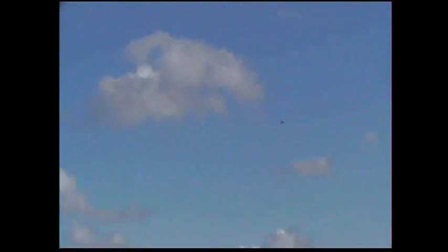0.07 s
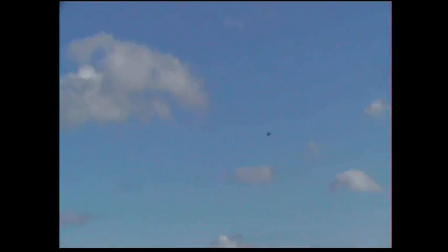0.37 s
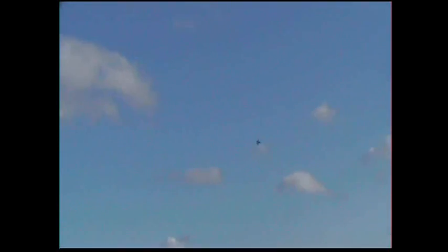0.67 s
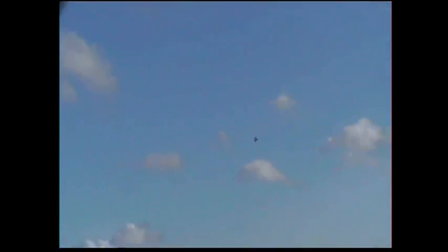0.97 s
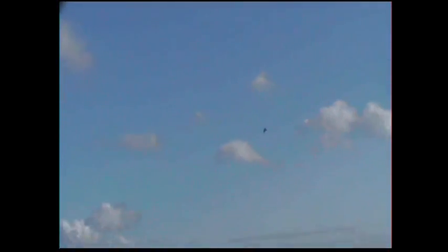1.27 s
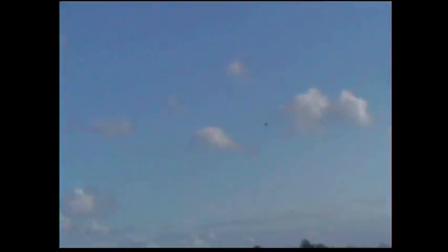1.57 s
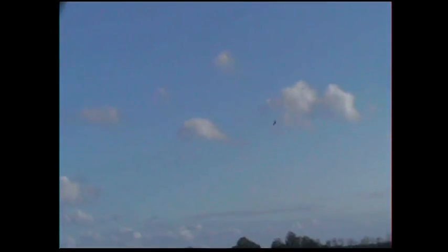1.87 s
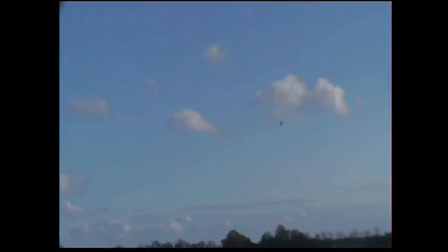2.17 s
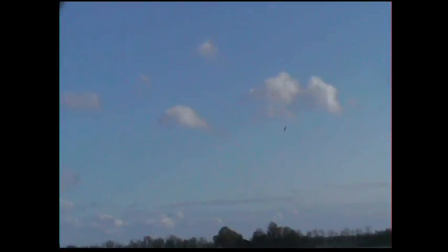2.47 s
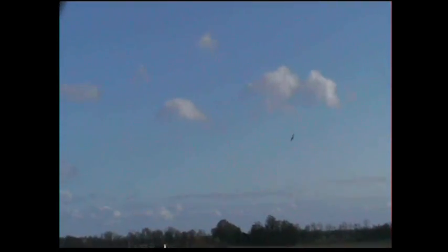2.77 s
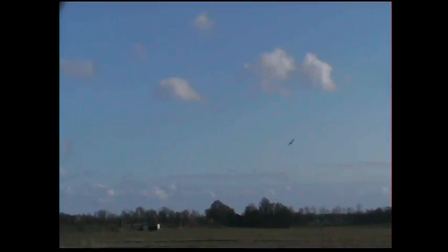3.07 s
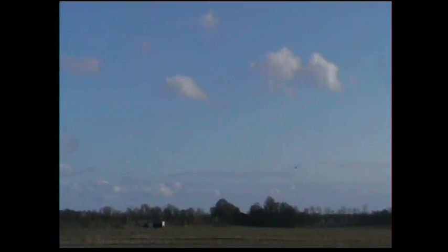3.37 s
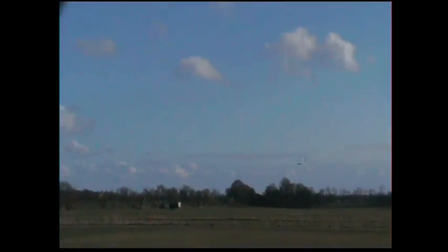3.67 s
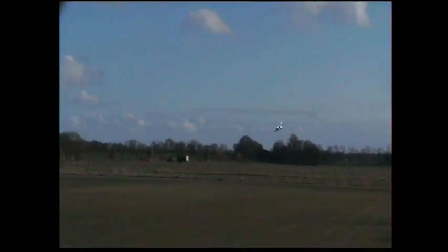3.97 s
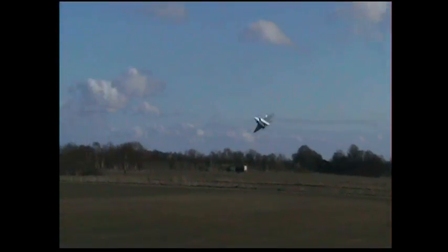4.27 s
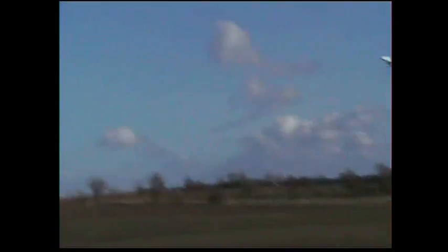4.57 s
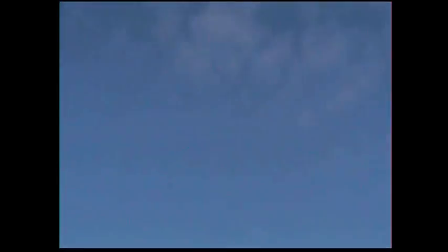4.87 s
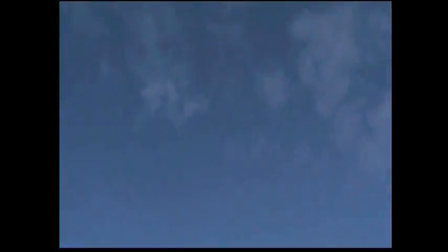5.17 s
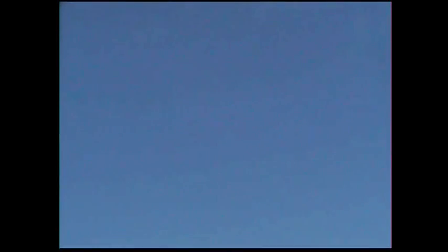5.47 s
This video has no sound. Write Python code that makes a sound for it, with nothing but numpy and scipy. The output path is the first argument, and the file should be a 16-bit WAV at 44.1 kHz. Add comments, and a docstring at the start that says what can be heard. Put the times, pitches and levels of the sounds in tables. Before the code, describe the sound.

The high, wavering whine of an electric model jet approaches over a field, swells into a hissing close pass and falls.

```python
"""Low pass of a model jet

A model jet with an electric six-blade ducted fan dives toward a field and passes low and close.
The fan hums at its shaft rate and whines at its blade rate, both Doppler shifted, over the mixing
noise of its exhaust; interference with the ground echo sweeps a comb through that noise.
Light gusts touch the microphone of a camera that has a faint whistle of its own."""
import sys
import numpy as np
from scipy import signal
from scipy.fft import rfft, irfft, next_fast_len
from scipy.io import wavfile
from scipy.ndimage import uniform_filter1d

SR = 44100
rng = np.random.default_rng(int(sys.argv[2]) if len(sys.argv) > 2 else 0)


def master_out(mix):
    """Clip the mix to full scale and print it as 16-bit PCM to the path in sys.argv[1]."""
    frames = np.transpose(np.atleast_2d(mix))
    ceiling = np.clip(frames, -1, 1)
    pcm = np.round(ceiling * 32767).astype(np.int16)
    wavfile.write(sys.argv[1], SR, pcm)


N = 247664

# shaft rate as heard, Doppler shift included: t/s, f/Hz
SHAFT_RATE = [(0, 476.3), (.5, 484.7), (.75, 490.3), (1, 498.3), (1.5, 513.6), (2, 532.7), (2.25, 538.7),
              (2.5, 543), (2.8, 545.8), (3.5, 550.7), (4.2, 551.7), (4.55, 549.4), (4.72, 544),
              (4.9, 534.8), (5.1, 520.5), (5.25, 505.3), (5.45, 481), (5.62, 466.5)]


def fan(path, twinkle_db, treble_db):
    """Rotor harmonics: a hum at the shaft rate, a whine at multiples of six times it, a buzz between."""
    # tone at the shaft rate: t/s, level/dB
    hum_levels = [(0.0, -50), (0.28, -49.5), (0.87, -46), (0.97, -41), (1.41, -41.5), (1.52, -39.5),
                  (2.14, -44), (2.92, -57.5), (3.27, -53), (3.68, -57), (3.74, -70), (3.94, -50.5),
                  (4.88, -31.5), (5.1, -35.5), (5.15, -42.5), (5.27, -35.5), (5.51, -31.5), (5.62, -38.5)]
    # upper blade partials: shaft order, relative level/dB, share of the air absorption
    blade_partials = [(18, 2, 0), (24, -3.5, 0.68), (30, -6, 1.2)]
    # weak harmonics of the buzz: shaft order, relative level/dB
    shaft_orders = [(2, 2.5), (3, -0.5), (4, -4), (5, -6), (7, -5.5), (8, -39), (11, -44), (13, -33)]
    near_db, tail, whine_swing_db, octave_swing_db, _ = path
    hum_db = in_time(hum_levels)
    whine_db = -30.5 + 0.88 * near_db - 0.65 * tail + whine_swing_db
    octave_db = -42.5 + 1.15 * near_db + 1.3 * tail + octave_swing_db
    upper_db = heard(path, db=-51, near_share=1.485, tail_db=13.5, flare_share=1.1)
    buzz_db = 0.51 * hum_db + heard(path, db=-32.5, near_share=0.38, tail_db=-3, flare_share=0.67)
    shaft_hz = in_time(SHAFT_RATE) * (1 + 0.00028 * drift(2.98))
    angle = 2 * np.pi * np.cumsum(shaft_hz) / SR
    out = from_db(hum_db + 0.1) * wavering(angle, rough=0.11, rate=12)
    out += from_db(whine_db + 0.49 * twinkle_db) * wavering(6 * angle, rough=0.12, rate=45)
    out += from_db(octave_db + twinkle_db) * wavering(12 * angle, rough=0.7, rate=11)
    for order, db, share in blade_partials:
        partial_db = upper_db + db + share * treble_db + twinkle_db + flutter_db()
        out += from_db(partial_db) * wavering(order * angle, rough=0.73, rate=43)
    for order, db in shaft_orders:
        out += from_db(buzz_db + db) * wavering(order * angle, rough=0.53, rate=8.3)
    return out


def scattered_whine(path):
    """Scattering by the air and the field: rough tones that beat against the blade tone."""
    # returns off the field, with less Doppler lift: t/s, length/s, multiple of the shaft rate, level/dB
    returns = [(3.662, .14, 5.6, -48.5), (4.543, 0.16, 5.75, -38.5)]
    angle = 2 * np.pi * np.cumsum(in_time(SHAFT_RATE)) / SR
    halo_db = heard(path, db=-50, near_share=0.46, tail_db=5, flare_share=0.1)
    out = from_db(halo_db) * wavering(6 * angle, rough=1.8, rate=36)
    for s, length, multiple, db in returns:
        out += from_db(db) * bell(s, length) * wavering(multiple * angle, rough=2.5, rate=30)
    return out


def exhaust(path, twinkle_db, treble_db):
    """Turbulent mixing: five bands of noise, the deep wake beamed backward, the top absorbed by air."""
    # spectra of the bands: f/Hz, relative density/dB
    roar_spectrum = [(200, -25.5), (400, -6.5), (600, -1), (800, 4.5), (1050, 0.5), (1300, -12.5),
                     (1800, -5.5)]
    rush_spectrum = [(700, -6), (1250, 6), (1600, 3.5), (2100, 3.5), (2700, 7), (3300, 7), (4200, -48),
                     (6000, -26)]
    hiss_spectrum = [(2000, -2.5), (3000, -1), (3700, 6), (4600, 1), (5700, 3), (6500, -1), (7300, -6.5),
                     (9000, -37)]
    sizzle_spectrum = [(5000, 4), (7000, 1), (8200, 0), (9400, -0.5), (10800, -2), (12800, -3),
                       (14500, -10), (16500, -5)]
    wake_spectrum = [(100, -20), (200, -12.5), (300, -9), (420, -4.5), (600, 1), (800, -0.5), (1200, -61)]
    roar_db = heard(path, db=-49.5, near_share=0.5, tail_db=5.5, flare_share=0.21)
    roar_db += 9 * bell(s=4.325, length=0.035)   # a brief swell as the jet closes in
    rush_db = heard(path, db=-40, near_share=0.84, tail_db=-1, flare_share=0.48)
    hiss_db = heard(path, db=-36, near_share=0.99, tail_db=-1, flare_share=1.0)
    sizzle_db = heard(path, db=-43, near_share=1.51, tail_db=9, flare_share=1.27)
    wake_db = heard(path, db=-70, near_share=0.83, tail_db=30.5, flare_share=0.1)
    sizzle = noise(sizzle_spectrum)
    top = coloured(sizzle, [(8000, -40), (10500, -6), (12500, 0)])
    sizzle = sizzle - top + top * from_db(treble_db + flutter_db())
    out = from_db(roar_db) * noise(roar_spectrum)
    out += from_db(rush_db + 1.3 * twinkle_db) * noise(rush_spectrum)
    out += from_db(hiss_db + 1.36 * twinkle_db) * noise(hiss_spectrum)
    out += from_db(sizzle_db + 0.57 * twinkle_db + flutter_db()) * sizzle
    return out + from_db(wake_db) * noise(wake_spectrum)


def flight():
    """Propagation from a moving source: nearness/dB, tail-on share, swings/dB of whine, octave, hiss."""
    # nearness of the jet: t/s, level/dB relative to the closest point
    nearness = [(0, -29), (1.2, -34.5), (1.75, -32), (2.35, -26.5), (2.75, -22), (2.87, -21), (3.45, -18),
                (3.95, -9.5), (4.2, -3), (4.6, 0), (4.9, -1.5), (5.25, -3.5), (5.62, -6)]
    # moving air focuses the sound for a moment: t/s, length/s, whine/dB, octave/dB, hiss/dB
    flares = [(0.027, 0.11, 9.5, 20.5, 7.5), (0.216, 0.11, 17, 18.5, 13), (0.63, 0.05, 3.5, 9, 6),
              (0.748, .08, 5, 15, 5), (0.986, 0.12, 6, 14, 7.5), (1.395, 0.11, 14.5, 10, 8.5),
              (1.546, 0.093, 10, -4, 4.5), (1.775, 0.063, 10.5, 2, 7), (1.937, 0.12, 9, 5, 7.5),
              (2.151, 0.22, 18, 9, 11), (2.603, 0.45, 5, -0.5, 0), (2.891, 0.16, 6.5, 12.5, 6.5),
              (3.163, 0.17, 7, 7, 8), (3.68, .15, 6.5, 0, 1), (3.86, .09, 0, 8, 3.5),
              (4.15, 0.37, 5.5, -2, 2), (4.604, 0.093, 1.5, 5.5, 4), (4.801, 0.025, -0.5, 7, 4),
              (4.91, 0.066, 0.5, 3, 2.5), (5.036, 0.091, 4, 6, 1), (5.115, 0.052, 8, 3, 1.5),
              (5.194, 0.037, 7, -0.5, -2), (5.268, 0.044, 3.5, 1, 4), (5.482, 0.12, -4, 11, 1.5),
              (5.578, 0.095, 5.5, 2, 0)]
    # the whine fades briefly: same columns
    dropouts = [(1.184, 0.32, -4.5, 0, 0), (2.318, 0.12, -3, 3, -4), (3.023, 0.055, -8, 6, 5.5),
                (3.43, 0.11, -1.5, -18, 6), (3.975, 0.095, -12.5, 2, 1), (4.841, 0.037, -21, 1, 0),
                (4.967, 0.067, -9.5, 3, 0), (5.082, 0.017, -16, -5, -3), (5.409, 0.1, -11.5, -9, -3)]
    # the Doppler drop tells how far the jet has turned its tail to the listener
    nose_on_hz, tail_on_drop_hz = 552, 55.6
    tail = np.sqrt(np.clip((nose_on_hz - in_time(SHAFT_RATE)) / tail_on_drop_hz, 0, 1))
    swings_db = sum(np.outer(dbs, bell(s, length)) for s, length, *dbs in flares + dropouts)
    return in_time(nearness), tail, *swings_db


def heard(path, db, near_share, tail_db, flare_share):
    """Spreading, directivity and focusing: a layer's level/dB follows nearness, tail angle and flares."""
    near_db, tail, _, _, flare_db = path
    return db + near_share * near_db + tail_db * tail + flare_share * flare_db


def wavering(phase, rough, rate):
    """Scintillation: turbulent air shakes the amplitude and phase of a tone of unit power."""
    in_phase = (1 + rough * drift(rate)) * np.sin(phase)
    quadrature = rough * drift(rate) * np.cos(phase)
    return np.sqrt(2 / (1 + 2 * rough ** 2)) * (in_phase + quadrature)


def flutter_db():
    """Scintillation of the treble: a separate level swing/dB for each high partial or band."""
    return 1.23 * drift(11.6)


def over_ground(x):
    """Two-path interference: direct sound and its bounce off the grass form a moving comb filter."""
    # lag of the bounce, short while the jet is low: t/s, lag/ms
    ground_lag = [(0, 2.75), (.7, 2.48), (1.2, 2.15), (2.2, 1.4), (2.9, 1.35), (3.35, 1.27), (3.65, 1.18),
                  (3.95, .94), (4.25, .8), (4.52, .76), (4.72, .92), (4.9, 1.45), (5.05, 2.2), (5.25, 3.2),
                  (5.39, 3.66), (5.62, 3.6)]
    # at a grazing angle the grass turns the wave over: lag/ms, phase/rad
    bounce_phase = [(1.35, 4.03), (1.75, 4.1), (2.4, 5.36), (3.3, 5.87)]
    # reflection off rough grass at a steep angle: f/Hz, gain/dB
    grass_response = [(500, 0), (2000, -0.5), (4000, -3.5), (8000, 2), (14000, -18)]
    lag_ms = in_time(ground_lag)
    grazing = np.interp(lag_ms, [0.88, 1.36], [1, 0])
    # at a grazing angle the bounce is stronger and keeps more of its treble
    strength = 0.42 + 0.2 * grazing
    dull = coloured(x, grass_response)
    reflected = dull + 0.6 * grazing * (x - dull)
    analytic = signal.hilbert(reflected, next_fast_len(N))[:N]
    phase = np.interp(lag_ms, *np.transpose(bounce_phase))
    bounce = np.real(np.exp(1j * phase) * delayed(analytic, lag_ms / 1000))
    return (x + strength * bounce) / np.sqrt(1 + strength ** 2)


def far_echo(x, lag_s, level_db):
    """Reflection from the edge of the field: one late, dull return."""
    dull = signal.sosfilt(signal.butter(1, 3500, fs=SR, output="sos"), x)
    return from_db(level_db) * delayed(dull, lag_s)


def ports(x, diffuse):
    """Spatial coherence: two close microphone ports agree in the midrange and part in the treble."""
    # diffuse sound that reaches the ports in opposite phase: f/Hz, gain/dB
    side_response = [(100, -8), (1000, -42), (3000, -24), (6000, -19.5), (10000, -10.5), (15000, -1.5)]
    # the left port is the brighter one: f/Hz, left minus right/dB
    balance = [(250, 0.5), (500, -1), (1400, -1.94), (3000, 0.83), (6000, 1.5), (10000, 1.5), (14000, 2.5)]
    side = coloured(diffuse, side_response)
    left = coloured(x, [(hz, db / 2) for hz, db in balance])
    right = coloured(x, [(hz, -db / 2) for hz, db in balance])
    return np.array([left + side, right - side])


def wind(lumpy_db):
    """Turbulent pressure on the ports: breeze and lumpy gusts, separate on each, and shared buffets."""
    # gusts: t/s, length/s, level/dB
    gusts = [(0.437, 0.038, -59), (.92, 0.025, -47), (1.014, 0.046, -58.5), (1.254, 0.13, -46.5),
             (1.354, 0.09, -51), (1.525, 0.18, -47), (1.743, 0.035, -52), (2.592, .05, -51),
             (3.603, 0.083, -55), (3.761, 0.077, -53.5), (4.165, 0.44, -65), (4.516, 0.085, -53.5),
             (4.648, 0.089, -42)]
    # spectra of the gusts and the steady breeze: f/Hz, relative density/dB
    gust_spectrum = [(20, -34), (50, -14), (100, -2), (170, -2), (250, -8), (350, -15), (600, -24),
                     (1500, -47)]
    breeze_spectrum = [(20, -1), (60, 3), (120, -3), (250, -26)]
    # single buffets, each a damped sine: t/s, level/dB, f/Hz
    buffets = [(1.241, -33.5, 190), (1.308, -34.5, 276), (2.589, -50, 153), (4.645, -53, 180)]
    t = np.arange(N) / SR
    eddies = np.array([rms_one(noise(gust_spectrum) * from_db(lumpy_db * drift(18))) for _ in range(2)])
    force = sum(from_db(db) * bell(s, length) for s, length, db in gusts)
    breeze = np.array([noise(breeze_spectrum), noise(breeze_spectrum)])
    out = force * eddies + from_db(-74) * breeze
    for s, db, hz in buffets:
        cycles = np.maximum(t - s, 0) * hz
        out += from_db(db) * np.sin(2 * np.pi * cycles) * np.exp(-cycles / 2.15)
    return out * from_db([[-1.7], [1.7]])   # stronger on the right


def camera():
    """Noise floor and a thin electronic whistle, modulated in phase and level once per picture."""
    # still air over the field and camera hiss: f/Hz, relative density/dB
    floor_spectrum = [(20, -11), (100, -5.5), (300, -6.5), (800, -4.5), (2000, -7.5), (5000, -15.5),
                      (9000, -18.5), (16000, -23)]
    whistle_hz, whistle_db, sag_db = 14224.5, -67.5, -4
    pictures_per_s, slip_turns, slip_s = 50, 0.43, 0.004
    t = np.arange(N) / SR
    common = from_db(-66) * noise(floor_spectrum)
    separate = from_db(-69) * np.array([noise(floor_spectrum), noise(floor_spectrum)])
    scan = uniform_filter1d(t * pictures_per_s % 1, size=int(slip_s * SR))   # a rounded sawtooth
    phase = 2 * np.pi * (whistle_hz * t - slip_turns * scan)
    return common + separate + from_db(whistle_db + sag_db * scan) * np.sin(phase)


def from_db(db):
    """Decibels to amplitude gain."""
    return 10 ** (np.asarray(db) / 20)


def rms_one(x):
    """Normalisation to unit power."""
    return x / np.sqrt(np.mean(np.abs(x) ** 2) + 1e-20)


def in_time(rows):
    """Linear interpolation of (t/s, value) rows at every sample."""
    return np.interp(np.arange(N) / SR, *np.transpose(rows))


def bell(s, length):
    """Gaussian pulse centred at time s; length is its full width at half height."""
    return np.exp2(-np.minimum((2 * (np.arange(N) / SR - s) / length) ** 2, 60))


def coloured(x, spectrum):
    """Zero-phase filtering by (f/Hz, gain/dB) rows, held level beyond their ends."""
    size = next_fast_len(N)
    hz, db = np.transpose(spectrum)
    bin_hz = np.arange(size // 2 + 1) * SR / size
    gain = from_db(np.interp(np.log(bin_hz + 1), np.log(hz), db))
    return irfft(rfft(x, size) * gain, size)[..., :N]


def noise(spectrum):
    """Spectral shaping: noise of unit power that dies away an octave beyond the ends of its spectrum."""
    below, above = (spectrum[0][0] / 2, -90), (spectrum[-1][0] * 2, -90)
    return rms_one(coloured(rng.standard_normal(N), [below, *spectrum, above]))


def drift(rate):
    """Slow random motion of unit power: noise through two low-pass poles at rate/Hz."""
    hop, settling_steps = 40, 2000
    pole = np.exp(-2 * np.pi * hop * rate / SR)
    white = rng.standard_normal(N // hop + settling_steps + 2)
    slow = signal.lfilter([1], [1, -2 * pole, pole * pole], white)[settling_steps:]
    return np.interp(np.arange(N) / hop, np.arange(len(slow)), rms_one(slow))


def delayed(x, lag_s):
    """Propagation delay, steady or varying in time."""
    return np.interp(np.arange(N) - lag_s * SR, np.arange(N), x, left=0)


def scene():
    """Superposition of the jet, its echoes, the wind and the camera at two ports."""
    path = flight()
    near_db = path[0]
    # twinkle from turbulent air and absorption of the top treble both deepen over a long path
    twinkle_db = (0.48 - 0.0477 * near_db) * drift(8.2)
    treble_db = 2.5 + 0.43 * near_db
    tones = fan(path, twinkle_db, treble_db) + scattered_whine(path)
    rush = exhaust(path, twinkle_db, treble_db)
    jet = tones + over_ground(rush)
    jet += far_echo(jet, lag_s=0.44, level_db=-25.5)
    # sound that arrives late and from all around reaches the two ports differently
    diffuse = delayed(tones, lag_s=0.000396) + delayed(rush, lag_s=0.035)
    return ports(jet, diffuse) + wind(lumpy_db=3) + camera()


def record(dry):
    """Band limiting: the bass is thinned below 40 Hz and the top is cut at 16 kHz."""
    thinned = signal.sosfilt(signal.butter(1, 40, "high", fs=SR, output="sos"), dry)
    return signal.sosfilt(signal.ellip(10, 0.2, 80, 16000, fs=SR, output="sos"), thinned)


dry = scene()
out = record(dry)
master_out(out)
```